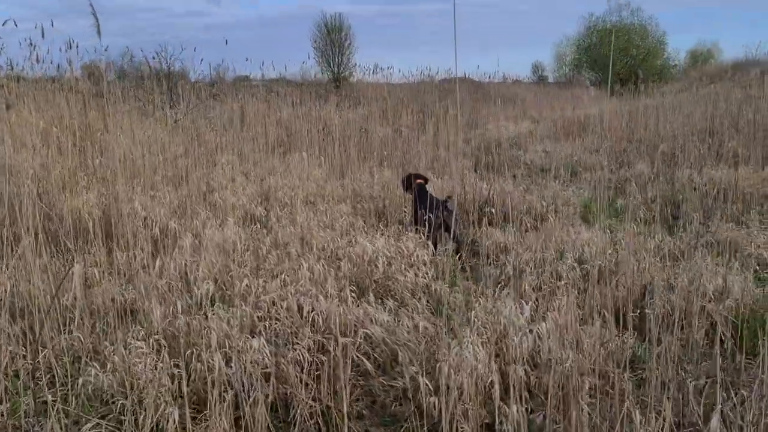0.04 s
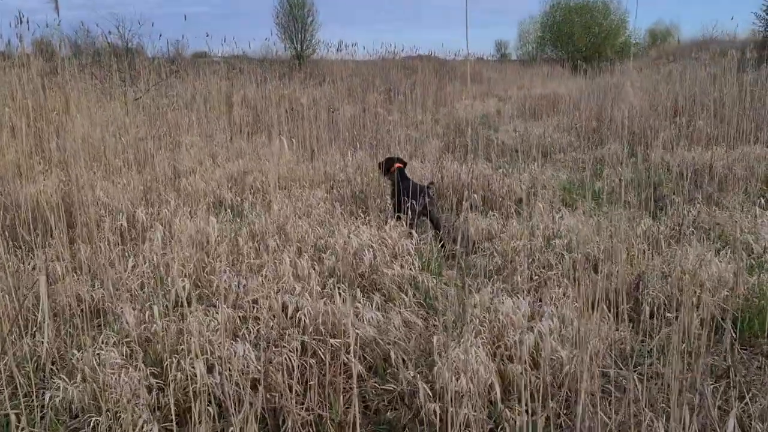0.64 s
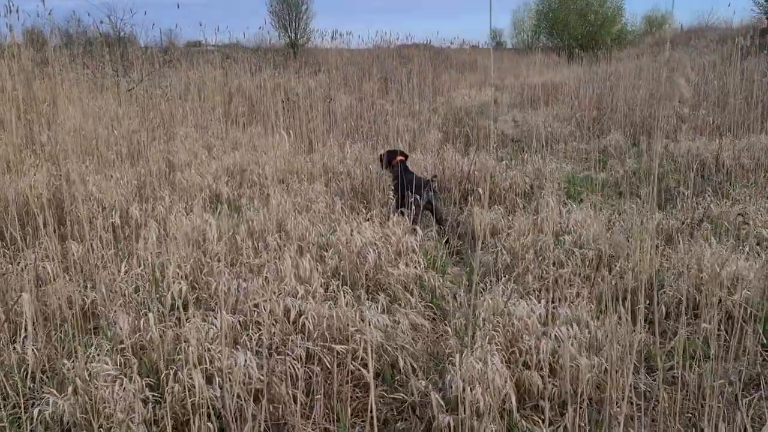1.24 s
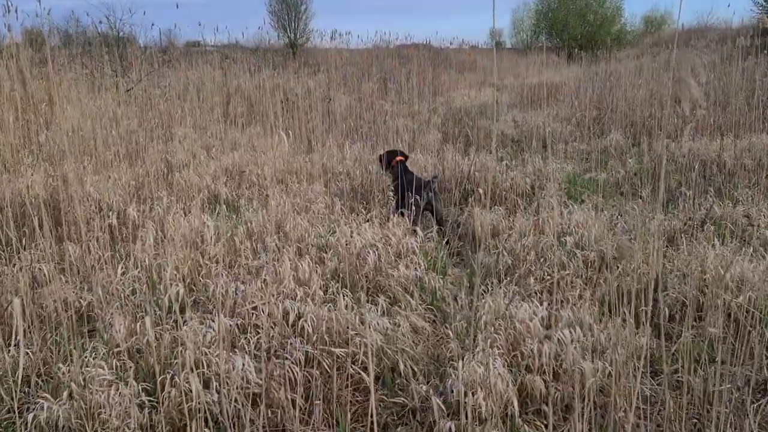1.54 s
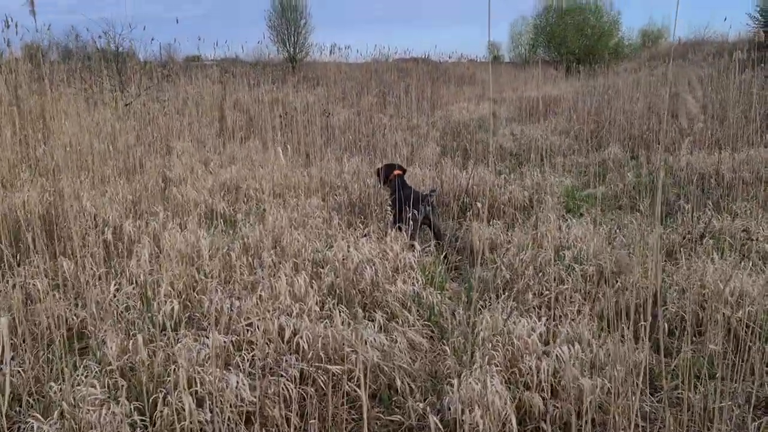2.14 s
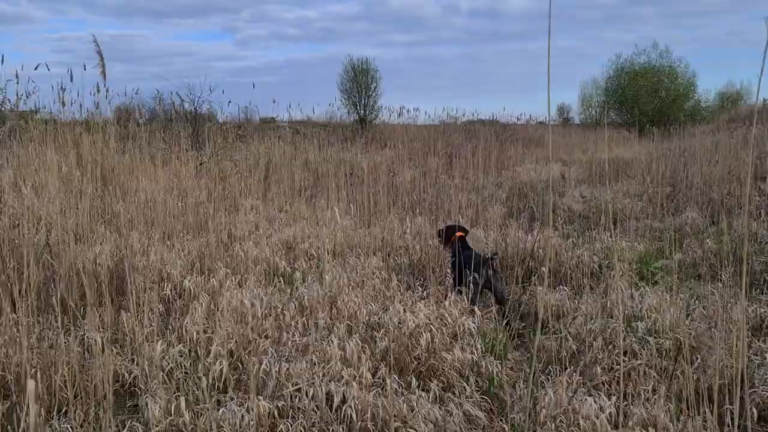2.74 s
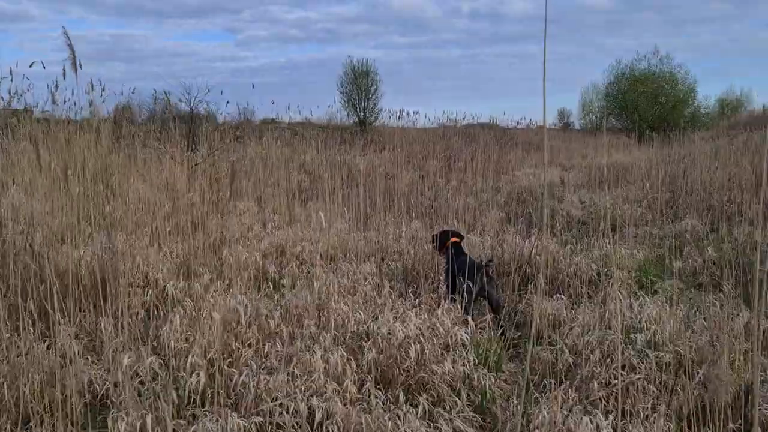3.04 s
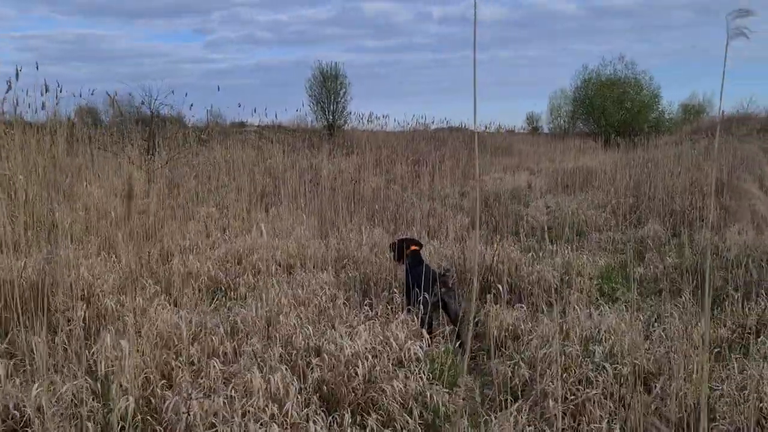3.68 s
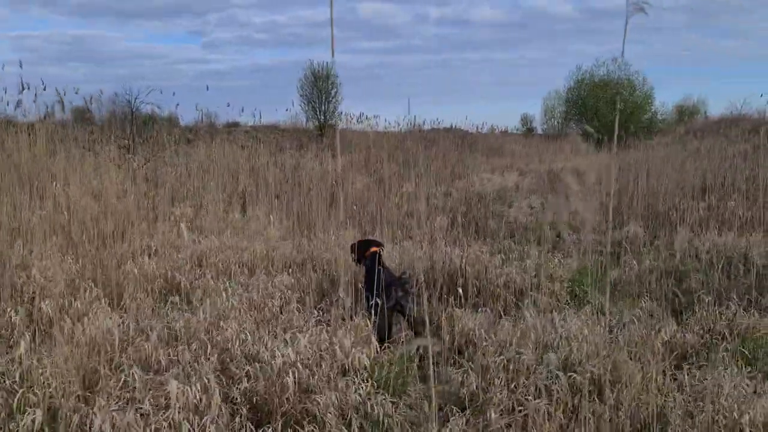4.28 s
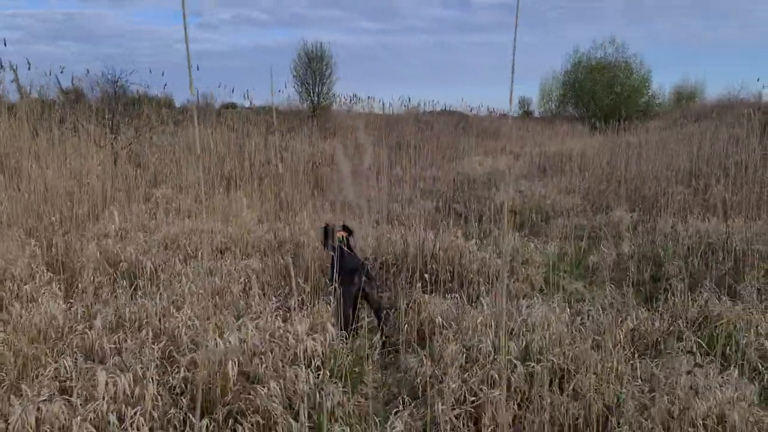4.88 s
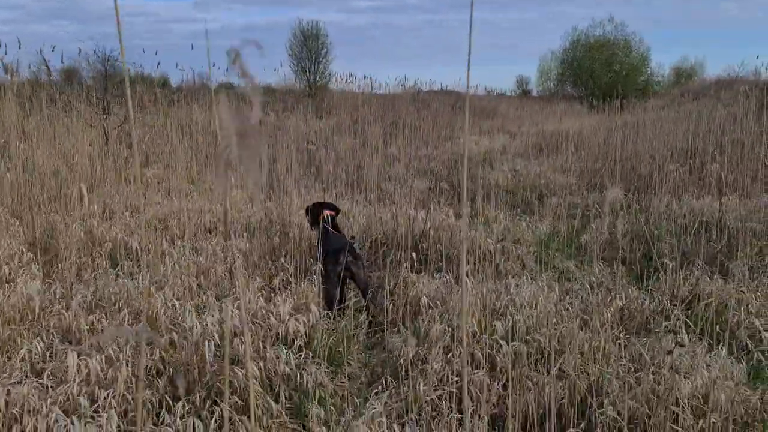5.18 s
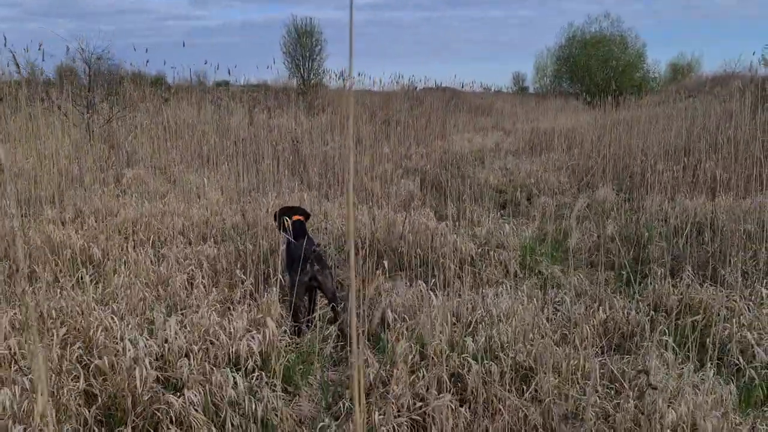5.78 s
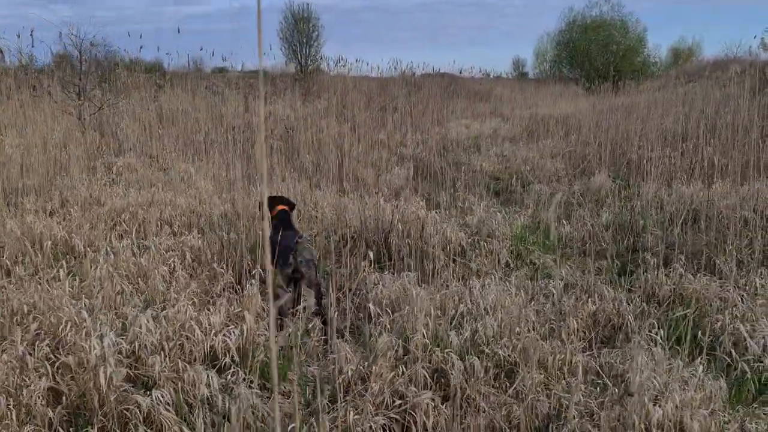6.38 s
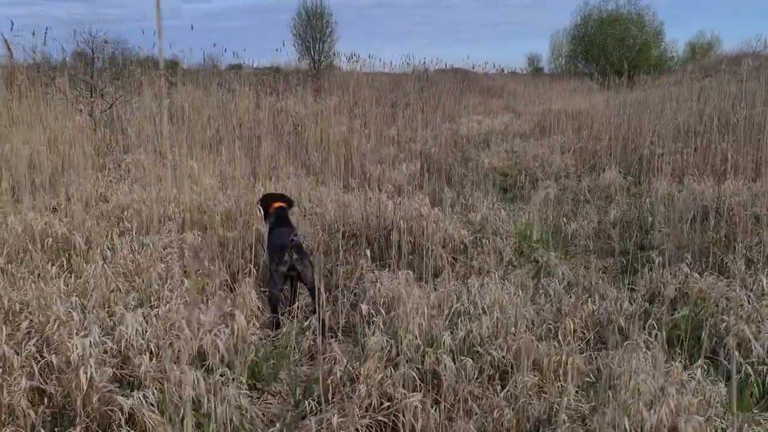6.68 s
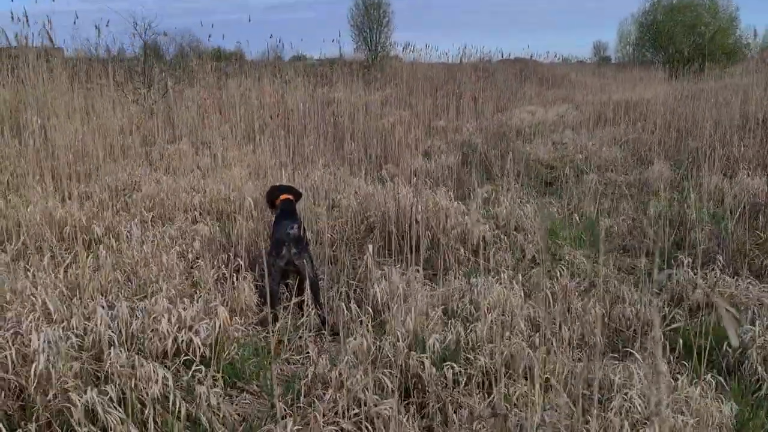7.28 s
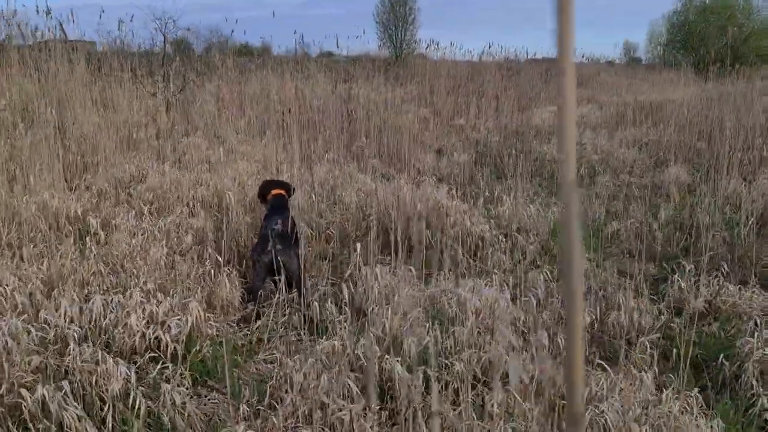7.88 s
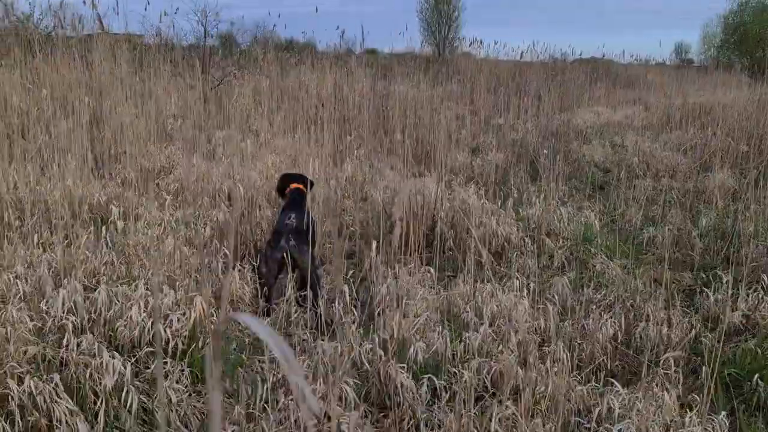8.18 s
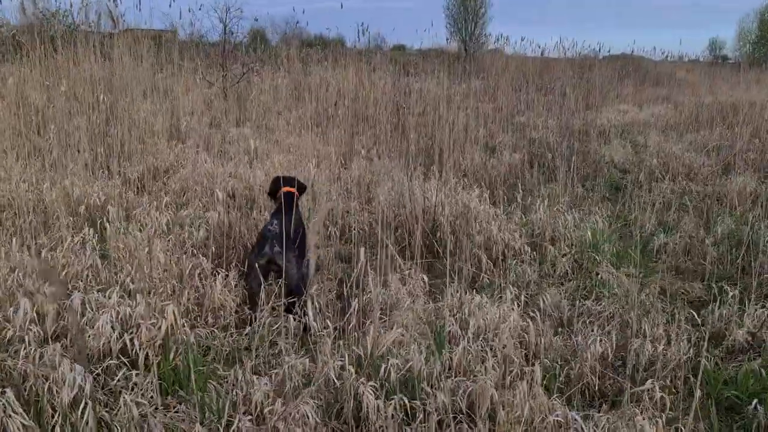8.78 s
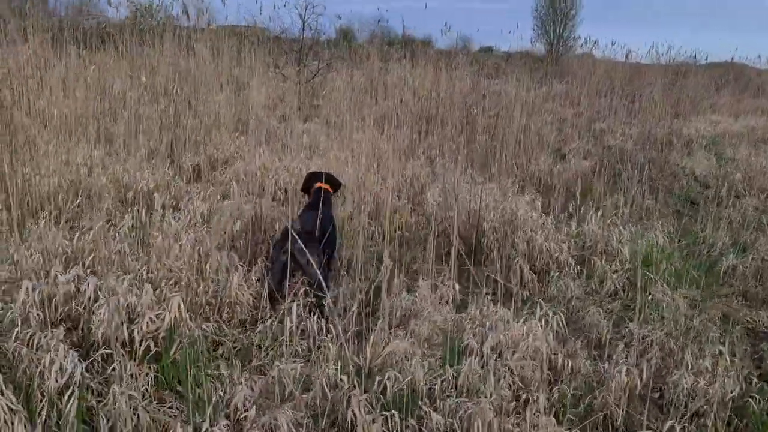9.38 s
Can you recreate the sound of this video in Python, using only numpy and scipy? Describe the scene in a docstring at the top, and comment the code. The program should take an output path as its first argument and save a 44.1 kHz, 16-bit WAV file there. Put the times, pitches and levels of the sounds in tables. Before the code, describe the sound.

Dry grass swishes and crackles as someone wades through an open field, with soft footfalls, light wind rumble and faint birds.

```python
"""Someone wades slowly through dry grass and reeds in an open field, carrying the microphone.
Light strides come first, over faint wind, a thin hum and a far bird's hoots; small birds chirp now and then.
From about 3.5 s the legs push harder: blades hiss with countless tiny slips, stems bend and snap, feet thud.
The hum fades by 6 s and the walking eases, then the heaviest strides follow from 7.5 s.
The wind swells briefly just before the end."""
import sys
import numpy as np
from scipy import signal
from scipy.fft import rfft, irfft, next_fast_len
from scipy.io import wavfile
from scipy.ndimage import uniform_filter1d

SR = 44100
rng = np.random.default_rng(int(sys.argv[2]) if len(sys.argv) > 2 else 0)


def master(y):
    """Save y as 16-bit WAV."""
    cut = np.clip(np.atleast_2d(y).T, -1, 1)
    pcm = np.round(cut * 32767)  # scale
    wavfile.write(sys.argv[1], SR, pcm.astype(np.int16))


N = 420273
TIME = np.arange(N) / SR
PORT_LAG_S = 0.00013  # nominal; the grass lies a little to the right, so the left port hears it later


def undb(db):
    """Decibels to gain."""
    return 10 ** (np.asarray(db) / 20)


def curves(table):
    """The columns of a table, joined by straight lines in time."""
    times, *columns = np.transpose(table)
    return [np.interp(TIME, times, column) for column in columns]


def unit(x):
    """Scale to rms 1."""
    return x / np.sqrt(np.mean(x ** 2) + 1e-18)


def pan(db):
    """Constant-power gains; db is left minus right."""
    return unit(undb(np.array([[db], [-db]]) / 2))


def add(out, start_s, sound):
    """Mix a sound in at its start time."""
    i = int(start_s * SR)
    out[..., i:i + sound.shape[-1]] += sound[..., :N - i]


def wander(rate_hz):
    """Smooth random drift with a spread near 1."""
    hold = int(SR / rate_hz)
    return 1.2 * uniform_filter1d(np.repeat(rng.standard_normal(N // hold + 1), hold), hold)[:N]


def colour(x, points, size=2048, ripple_db=0, ripple_hz=700):
    """Causal EQ plus random resonances about ripple_hz apart; white noise keeps its power."""
    hz, db = np.transpose(points)
    f = np.maximum(np.arange(size // 2 + 1) * SR / size, 1)
    ripple = np.interp(f / ripple_hz, np.arange(128), rng.standard_normal(128))
    gain = unit(undb(np.interp(np.log(f), np.log(hz), db) + ripple_db * ripple))
    cepstrum = irfft(np.log(gain))
    cepstrum[1:size // 2] *= 2  # fold to minimum phase
    cepstrum[size // 2 + 1:] = 0
    impulse = irfft(np.exp(rfft(cepstrum)))
    return signal.oaconvolve(x, impulse[None], axes=1)[:, :x.shape[1]]


def port_noise(bass, treble, lag_s=0, count=N):
    """Noise at two microphone ports, with the given likeness (0-1) below and above 1300 Hz."""
    size = next_fast_len(count, True)
    f = np.arange(size // 2 + 1) * SR / size
    likeness = np.clip(treble + (bass - treble) / (1 + (f / 1300) ** 2), 0, 1)
    shared, left, right = rfft(rng.standard_normal((3, size)))
    common = np.sqrt(likeness) * np.array([shared * np.exp(-2j * np.pi * f * lag_s), shared])
    apart = np.sqrt(1 - likeness) * np.array([left, right])
    return irfft(common + apart, size)[:, :count]


def grains(per_s, spread_db, decay_s, ring_s, ring):
    """Envelope of random slips: many small, few large, each a tick with a short ring; mean power 1."""
    chance, size = rng.random(N), np.minimum(rng.standard_normal(N), 2.6)
    energy = undb(spread_db * size) ** 2
    slips = (chance < per_s / SR) * energy / energy.mean() * SR / per_s
    t = TIME[:SR // 20]
    fade = (1 - ring) * np.exp(-2 * t / decay_s) / decay_s + ring * np.exp(-2 * t / ring_s) / ring_s
    return np.sqrt(np.maximum(signal.oaconvolve(slips, fade / fade.sum())[:N], 0))


# Tone of the wind and of the field's hush. Each row: frequency in Hz, relative level in dB.
WIND_EQ = [(12, -31), (25, -28), (40, -3), (50, -6), (63, 4), (80, -4), (100, -4), (122, -14.5),
           (146, -12.5), (185, -29), (400, -45), (1500, -60)]
HUSH_EQ = [(100, 2), (220, -12.5), (400, 1), (600, 0.5), (1000, -8), (2200, -6), (3300, -9.5), (6000, -13),
           (10000, -9.5), (16000, -11.5)]

def air():
    """Low wind rumble that swells late on, over the faint hush of the whole field."""
    gust_db, = curves([(0, -54), (2.5, -54), (4.2, -54.5), (6, -56), (7.2, -54.5), (8.8, -55),
                       (9.25, -49.5), (9.5, -54)])
    rumble = colour(port_noise(0.91, .4), WIND_EQ, size=16384) * undb(gust_db + 0.27 * wander(6))
    hush = colour(port_noise(0.57, 0.036), HUSH_EQ) * undb(-63 + 3.3 * wander(3.25))
    return rumble * pan(-1.3) + hush


# The hum's fader ride. Each row: time in seconds, level in dB.
HUM_FADER = [(0, -75), (2.1, -82.5), (2.3, -71), (3.45, -64.5), (3.65, -71.5), (4.25, -66.5), (4.5, -80),
             (5.8, -77), (6.2, -90)]

def far_hum(hz=642):
    """A thin, distant tone that wavers slightly in pitch and level."""
    level_db, = curves(HUM_FADER)
    gain = undb(level_db + 0.43 * wander(13))
    pitch = hz * (1 + 0.0023 * wander(19))
    return gain * np.sqrt(2) * np.sin(2 * np.pi * np.cumsum(pitch) / SR)


# Small birds. Each row: start in seconds, first and last pitch in Hz, level in dB.
CHIRP_CUES = [(1.25, 4200, 3670, -60), (1.607, 3650, 4030, -60.5), (3.26, 3300, 3670, -60.5),
              (3.29, 4250, 3980, -64), (3.545, 2830, 3300, -58), (4.19, 3350, 2850, -72),
              (4.285, 2050, 2550, -57), (4.38, 3270, 2700, -60), (4.45, 2070, 2500, -62),
              (4.545, 3100, 2700, -61), (4.61, 1990, 2390, -62), (8.225, 4450, 3800, -56),
              (8.35, 4870, 4300, -56.5)]
# A hooting bird. Each row: start in seconds, pitch in Hz, level in dB.
HOOT_CUES = [(.42, 540, -69), (1.15, 498, -68), (1.78, 552, -67), (2.07, 530, -67)]

def far_birds(chirp_s=0.0356, hoot_s=.15):
    """Gliding chirps and soft hoots, scattered by the reeds on their way."""
    calls = np.zeros(N)
    progress = np.linspace(0, 1, int(chirp_s * SR))
    arch = np.sin(np.pi * progress)
    for start_s, first_hz, last_hz, db in CHIRP_CUES:
        pitch = (first_hz + (last_hz - first_hz) * progress) * (1 + 0.0685 * arch)
        add(calls, start_s, undb(db) * arch * np.sqrt(2) * np.sin(2 * np.pi * np.cumsum(pitch) / SR))
    t = TIME[:int(hoot_s * SR)]
    for start_s, hz, db in HOOT_CUES:
        add(calls, start_s, undb(db) * np.hanning(len(t)) * np.sqrt(2) * np.sin(2 * np.pi * hz * t))
    t = TIME[:SR // 3]
    scatter = unit(rng.standard_normal((2, len(t))) * np.exp(-t / 0.033)) / np.sqrt(len(t))
    return calls + undb(-10) * signal.oaconvolve(calls[None], scatter, axes=1)[:, :N]


# The rustle between strides. Each row: time in seconds, then blade, stalk and thatch levels in dB.
RUSTLE_BED = [(0, -52.5, -64.5, -65), (.1, -80, -67.5, -78), (.5, -59, -62, -88), (.85, -53, -61, -67),
              (1.2, -62, -70.5, -76), (1.55, -57.5, -66.5, -78), (1.9, -64, -69, -69.5),
              (2.5, -51, -63, -72), (2.75, -61.5, -71.5, -84), (3.45, -59.5, -60.5, -68),
              (4.1, -48, -56, -66), (4.45, -51.5, -59, -67.5), (5.5, -50, -56.5, -62),
              (6.1, -56, -68, -70.5), (6.9, -49.5, -57.5, -70.5), (8.35, -49.5, -60.5, -65),
              (9.53, -44.5, -53.5, -65.5)]
# A leg sweeps through the grass. Each row: time of full push, attack and hold in seconds,
# then blade hiss, stalk scrape and leg rub in dB.
LEG_SWEEPS = [(0.178, 0.054, 0.031, -39.5, -56, -74), (0.291, .12, 0.033, -42.5, -53.5, -73),
              (0.398, 0.032, 0.014, -39, -54, -56.5), (0.666, 0.19, 0.032, -49, -69, -76),
              (2.152, 0.08, 0.027, -42.5, -59.5, -88), (2.38, .12, 0.097, -46.5, -61.5, -80),
              (3.072, 0.089, 0.062, -55.5, -57, -59), (3.293, .04, 0.025, -49.5, -68, -59.5),
              (3.505, .04, 0.026, -46, -54, -62), (3.65, 0.11, .04, -38.5, -57, -57),
              (3.709, 0.049, 0.09, -32, -50, -69), (3.828, 0.065, 0.11, -35.5, -52, -60),
              (4.33, 0.029, 0.019, -44.5, -60, -67), (4.517, 0.065, 0.022, -47.5, -66, -77),
              (4.6, 0.037, 0.019, -48.5, -57.5, -66), (4.906, 0.28, .34, -33.5, -46.5, -79),
              (5.82, 0.15, .05, -43.5, -55, -54), (6.197, 0.027, 0.069, -41, -57.5, -70),
              (6.307, 0.088, 0.11, -39.5, -55.5, -79), (6.705, 0.24, 0.034, -43, -57.5, -61.5),
              (6.985, .04, 0.026, -47, -75, -81), (7.135, 0.061, 0.034, -40, -55.5, -75),
              (7.207, 0.04, 0.072, -39.5, -53, -57.5), (7.462, 0.3, 0.18, -42.5, -54.5, -64),
              (7.611, .09, 0.15, -33.5, -45, -53.5), (7.789, 0.073, 0.062, -31.5, -45, -55.5),
              (8.196, .02, 0.031, -50, -63, -79), (8.564, 0.079, 0.021, -41.5, -51.5, -54.5),
              (8.664, .04, 0.015, -40, -51.5, -52.5), (8.871, 0.2, 0.043, -33, -45, -52),
              (8.965, 0.11, 0.23, -30, -47, -58), (9.234, 0.059, 0.046, -36, -45.5, -66),
              (9.484, 0.072, .04, -39, -51.5, -67)]
RELEASE_S = .16  # the blades spring back; attack and release each span 20 dB

def effort():
    """Hiss, scrape and rub levels in dB: each sweep swells, holds and lets go over the rustle bed."""
    power = undb(np.array(curves(RUSTLE_BED))) ** 2
    for push_s, attack_s, hold_s, *levels_db in LEG_SWEEPS:
        early, late = np.maximum(push_s - TIME, 0), np.maximum(TIME - push_s - hold_s, 0)
        shape_db = -20 * (early / attack_s + late / RELEASE_S)
        near = shape_db > -60
        power[:, near] += undb(np.array(levels_db)[:, None] + shape_db[near]) ** 2
    return 10 * np.log10(power)


# Footfalls on matted ground. Each row: start in seconds, level in dB, decay in seconds.
FOOTFALLS = [(.394, -45.5, 0.029), (1.744, -52, 0.006), (3.723, -49, 0.0094), (3.79, -41, 0.0073),
             (3.957, -40.5, 0.012), (4.834, -39.5, 0.017), (5.343, -40, 0.023), (6.711, -39.5, 0.0088),
             (7.225, -50, 0.0073), (7.276, -43.5, 0.011), (7.646, -39.5, 0.018), (7.699, -46, 0.037),
             (9.105, -39.5, 0.0051), (9.232, -38, 0.015)]
# A boot scraping over stalks. Each row: start in seconds, level in dB, length in seconds.
BOOT_SCUFFS = [(3.95, -47, .025), (4.592, -56, .035), (5.335, -45, .075)]
# Muffled thatch, dull thud and raspy scuff. Each row: frequency in Hz, relative level in dB.
THATCH_EQ = [(80, -33), (160, -2), (240, -5), (380, 6), (520, -8), (800, -11), (2000, -60)]
THUD_EQ = [(50, -18), (120, -2), (220, -5.5), (350, 3), (520, -5.5), (750, -7.5), (1500, -15),
           (5000, -13.5)]
SCUFF_EQ = [(500, -37), (900, -10), (1300, 15), (1800, 11), (2400, 11), (2900, -21), (3900, -16),
            (4450, 17.5), (5500, -32), (12000, -46)]

def feet(rub_db):
    """Legs rub and the thatch crumples; footfalls land as soft, dead thuds; now and then a boot scrapes."""
    rub = port_noise(0.97, 0.98) * undb(rub_db)
    rub *= grains(350, spread_db=8, decay_s=0.006, ring_s=0.0091, ring=0.34)
    weight, blows, drag = np.zeros((3, N))
    t = TIME[:SR // 5]
    for start_s, db, decay_s in FOOTFALLS:
        add(weight, start_s, undb(db) * (1 - np.exp(-t / 0.00023)) * np.exp(-t / decay_s))
        add(blows, start_s + 0.00223, undb(db + 7) * np.hanning(SR // 1500))
    for start_s, db, length_s in BOOT_SCUFFS:
        add(drag, start_s, undb(db) * np.sin(np.linspace(0, np.pi, int(length_s * SR))))
    scrape = port_noise(.85, .6, PORT_LAG_S) * drag
    scrape *= grains(600, spread_db=2, decay_s=.001, ring_s=.004, ring=.5)
    thuds = colour(port_noise(0.79, 1) * weight + blows, THUD_EQ)
    return (colour(rub, THATCH_EQ) + thuds + colour(scrape, SCUFF_EQ)) * pan(-1.1)


def thin_stems(hiss_db, scrape_db, count=400, most_per_s=13, spread_db=6.5):
    """Snap cues for thin stems that give way at random, more often under a hard push."""
    chance, scatter = rng.random((count, 3)), rng.standard_normal((count, 3))
    per_s = most_per_s * np.clip(undb(.5 * (hiss_db + 31)), 0, 1)
    cues = []
    for (when, luck, splinter), (crack, knock, pitch) in zip(chance, np.clip(scatter, -2, 2)):
        i = int(when * N)
        if luck < per_s[i] * N / SR / count:
            crack_db = hiss_db[i] - 8 + spread_db * crack
            knock_db = scrape_db[i] - 1.5 + spread_db * knock
            cues.append((TIME[i], crack_db, knock_db, 3660 * np.exp(.2 * pitch), splinter / 2))
    return cues


def fracture(envelope, points, db, likeness, ripple_hz):
    """A short burst ringing with its own stem's resonances; db is its energy spread over 10 ms."""
    noise = port_noise(0.16, likeness, PORT_LAG_S * rng.random() ** 2, count=len(envelope))
    sound = colour(noise * envelope, points, size=512, ripple_db=2.5, ripple_hz=ripple_hz)
    return unit(sound) * undb(db) * np.sqrt(SR / 100 / len(envelope))


# The ring of a hollow stem. Each row: multiple of its pitch, relative level in dB.
STEM_RING = [(.04, -10), (.16, -5), (.4, 0), (.7, 0), (1.1, -2), (1.7, -2.5), (2.4, -10), (6, -35)]

def stem_eq(stem_hz):
    """Spectrum of a hollow stem; thin, high stems radiate little below their pitch."""
    thin = np.clip((stem_hz - 2200) / 2000, 0, 1.3)
    return [(ratio * stem_hz, db + 9 * thin * min(np.log2(ratio), 0)) for ratio, db in STEM_RING]


# The bright edge of a crack. Each row: frequency in Hz, relative level in dB.
CRACK_EQ = [(3800, -23.5), (6000, -11.5), (8200, 3.5), (10000, 5), (12500, 7), (15800, 0.5)]
# The featured snaps. Each row: start in seconds, crack and knock levels in dB over 10 ms,
# stem pitch in Hz, splintering share from 0 to 1.
SNAP_CUES = [(.4036, -32.5, -43, 3650, 0.23), (1.0728, -39, -32, 2440, 0.25), (1.5462, -46, -57, 3100, 0),
             (2.3714, -38.5, -44.5, 4000, 0.8), (2.4149, -43.5, -48, 2780, 0.9),
             (3.082, -50, -61, 3300, 0.4), (3.4889, -55, -49.5, 1400, 0.5), (3.6692, -32.5, -55, 3180, 0.8),
             (3.7159, -34, -32.5, 4600, .2), (3.7254, -28.5, -34, 2100, 0.7),
             (3.7525, -25.5, -38.5, 3800, 0.85), (3.8632, -20.5, -38.5, 3700, 0.8),
             (3.9347, -37, -35.5, 2400, 0.4), (4.0568, -50, -49.5, 2500, 0.6),
             (4.2513, -37, -44, 3460, 0.12), (4.3237, -35.5, -43, 3800, 0.5),
             (4.5499, -41, -42, 2700, 0.45), (4.8584, -30.5, -41, 3270, 0.6),
             (4.9078, -19.5, -24, 4430, 0.84), (4.9432, -27, -46, 3370, 0.8),
             (5.048, -26.5, -40, 3180, 0.8), (5.1439, -32, -58, 3820, 0.5), (5.1591, -29.5, -51, 3600, .4),
             (5.4356, -37, -48.5, 2680, 1), (5.8213, -42, -49.5, 2700, .2),
             (5.8615, -29.5, -25, 2270, 0.15), (5.8908, -34.5, -37, 3260, 0.1),
             (6.2583, -34, -64, 3300, 0.1), (6.7122, -45, -35, 2680, 0), (6.7279, -28.5, -35, 2700, 0),
             (6.8579, -33, -41, 4860, 0.1), (6.9115, -38, -54, 3770, 0.05), (6.9728, -40, -45.5, 4660, 0.5),
             (6.9884, -36, -42, 4530, .4), (7.6471, -38, -25, 3380, 0.57), (7.668, -38, -30.5, 3600, 0.5),
             (7.6828, -25, -31, 3300, 0.4), (7.6941, -21.5, -29.5, 3500, 0.7),
             (7.7346, -21, -30.5, 4330, 1), (7.7938, -18, -25.5, 3240, 0.7), (7.8582, -36, -47, 3600, .5),
             (8.202, -31.5, -48, 3600, 0.6), (8.2386, -39, -44.5, 3670, 0.6),
             (8.5681, -30, -45, 3900, 0.87), (8.6756, -34, -43, 3630, 0.3), (8.6799, -26, -47, 3400, 0.8),
             (8.8794, -43, -40, 2480, 0.9), (9.103, -29, -38, 3200, .4), (9.185, -23.5, -36, 3480, 0.9),
             (9.4431, -33.5, -35.5, 4400, 0.8)]

def snaps(thin_cues):
    """A stem breaks with one crack, its fibres splinter after it, and the hollow tube knocks."""
    out, t = np.zeros((2, N)), TIME[:SR // 25]
    fibres = grains(5000, spread_db=7, decay_s=0.00042, ring_s=0.00074, ring=0.53)
    for k, (start_s, crack_db, knock_db, stem_hz, splinter) in enumerate(SNAP_CUES + thin_cues):
        i = k * len(t) % (N - len(t))
        pan_db = -4.5 + 5 * rng.standard_normal()
        # a stem that splinters takes longer to give way; the grass around returns a faint tail
        tearing = np.exp(-t / (.002 + .003 * splinter)) + .07 * np.exp(-t / .012)
        splinters = unit(fibres[i:i + len(t)] * tearing)
        clean_break = unit(np.exp(-t / (.00045 + .0011 * splinter)) * (1 - np.exp(-t / .0002)))
        envelope = np.hypot(np.sqrt(1 - splinter) * clean_break, np.sqrt(splinter) * splinters)
        crack = fracture(envelope, CRACK_EQ, crack_db, likeness=.75, ripple_hz=800)
        knock = fracture(envelope, stem_eq(stem_hz), knock_db, likeness=.8, ripple_hz=350)
        add(out, start_s, crack * pan(pan_db) + knock * pan(pan_db / 2))
    return out


def passing(x, points, tuft_s=.35, **ripple):
    """The walker passes from tuft to tuft: the same EQ, with any resonances drawn afresh for each."""
    hop = int(tuft_s * SR)
    padded = np.pad(x, ((0, 0), (hop, 2 * hop)))
    out, window = np.zeros_like(padded), signal.get_window("hann", 2 * hop)
    for i in range(0, N + hop, hop):
        out[:, i:i + 2 * hop] += colour(padded[:, i:i + 2 * hop] * window, points, size=1024, **ripple)
    return out[:, hop:hop + N]


# Blades pushed hard, blades lightly brushed, and the midrange scrape of stalks.
# Each row: frequency in Hz, relative level in dB.
BLADE_EQ = [(1500, -28.5), (2900, -6), (4400, -3), (6500, -5), (8500, 2), (10000, 3), (12500, 5),
            (15800, -2)]
BRUSH_EQ = [(1500, -10.5), (3000, -5.5), (4200, -3.5), (6800, -5), (9000, 1), (11800, 1), (13800, -5),
            (15800, -7.5)]
STALK_EQ = [(250, -10), (700, -3.5), (1000, -3.5), (1500, -1), (2200, -2.5), (3400, -1), (5500, -8),
            (12000, -57)]

def tuft(hiss_db, scrape_db, lag_s):
    """One tuft: the harder the push, the denser and brighter the slips of its blades."""
    slips_per_s = 650 * undb(.5 * np.clip(hiss_db + 43, -25, 10))
    slips = grains(slips_per_s, spread_db=4, decay_s=.0005, ring_s=.006, ring=.62)
    # single slips close by stand out of the smooth sum of those further off
    blades = port_noise(0.98, 0.83, lag_s) * unit(np.hypot(slips, .7)) * undb(hiss_db)
    stalks = port_noise(0.98, 0.38, lag_s) * unit(np.hypot(slips, .8)) * undb(scrape_db)
    hard = np.clip((hiss_db + 57.5) / 17, 0, 1)
    hiss = hard * passing(blades, BLADE_EQ) + (1 - hard) * passing(blades, BRUSH_EQ, ripple_db=5)
    scrape = passing(stalks, STALK_EQ, ripple_db=3.5, ripple_hz=253)
    return hiss * pan(-1.3) + scrape * pan(-2.2)


def grass(hiss_db, scrape_db, tufts=3):
    """Tufts in different directions catch on the legs and let go; brittle blades tick among them."""
    contact = np.array([undb(5 * wander(17)) for _ in range(tufts)])
    shares = contact / np.sqrt(np.sum(contact ** 2, axis=0))
    clumps = undb(1.76 * wander(70))
    lags = PORT_LAG_S * np.linspace(.5, 1.3, tufts)
    swish = clumps * sum(share * tuft(hiss_db, scrape_db, lag_s) for share, lag_s in zip(shares, lags))
    ticks = port_noise(.9, .6, PORT_LAG_S / 2)
    ticks *= grains(90, spread_db=4, decay_s=.0008, ring_s=.004, ring=.4)
    crackle = colour(ticks * undb(hiss_db), BLADE_EQ) + colour(ticks * undb(scrape_db), STALK_EQ)
    push = np.clip((hiss_db + 54) / 20, .3, 1)  # a light brush breaks few blades
    return swish + undb(-9.5) * push * crackle


def scene():
    """The walker in the open field; the legs' effort drives the grass, the rub and the thin stems."""
    hiss_db, scrape_db, rub_db = effort()
    wading = grass(hiss_db, scrape_db) + feet(rub_db)
    background = far_hum() + far_birds() + air()
    return background + wading + snaps(thin_stems(hiss_db, scrape_db))


# Tone of the two microphone ports. Each row: frequency in Hz, left and right gain in dB.
PORT_EQ = [(100, 0, 0), (1400, 0, 0.5), (2620, -1.5, -0.5), (4300, -1.5, 1.5), (5400, 0, -0.5),
           (6600, 3, -0.5), (7960, 1.5, 1.5), (9800, -3.5, 0), (12400, -3.5, 1.5), (13900, 3.5, 4),
           (15500, -3, 2)]

def record(dry):
    """Each port colours the sound; the recorder rounds the very loudest cracks and cuts the top."""
    hz, *sides = np.transpose(PORT_EQ)
    f = np.maximum(np.linspace(0, SR / 2, 129), 1)
    gains = [undb(np.interp(np.log(f), np.log(hz), db)) for db in sides]
    taps = [np.fft.fftshift(irfft(gain))[1:] for gain in gains]
    heard = np.array([signal.oaconvolve(x, h, mode="same") for x, h in zip(dry, taps)])
    high_cut = signal.ellip(10, .2, 70, 16100, fs=SR, output="sos")
    return signal.sosfilt(high_cut, np.tanh(heard))


dry = scene()
out = record(dry)
master(out)
```